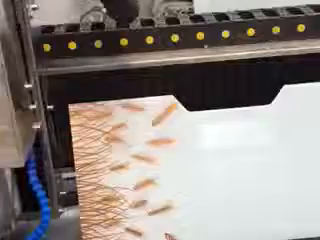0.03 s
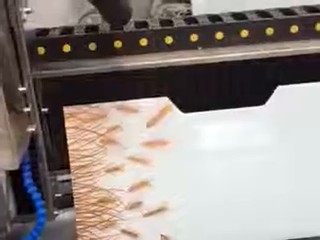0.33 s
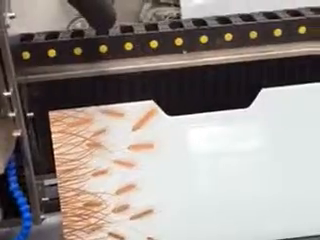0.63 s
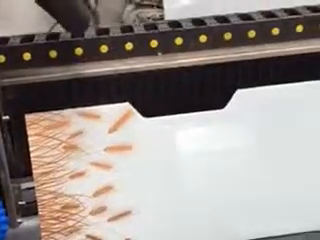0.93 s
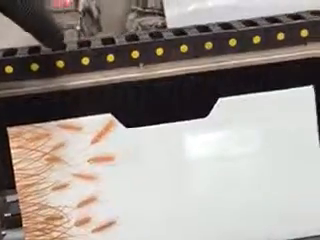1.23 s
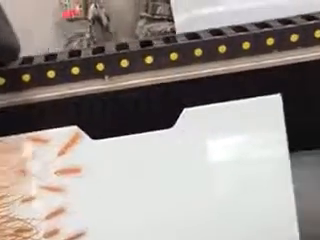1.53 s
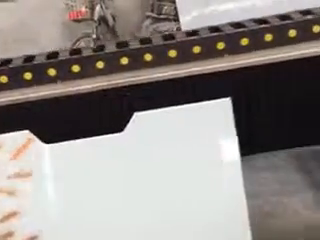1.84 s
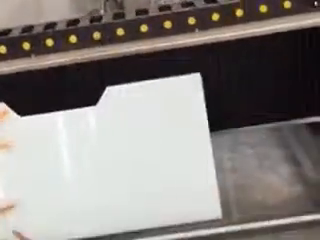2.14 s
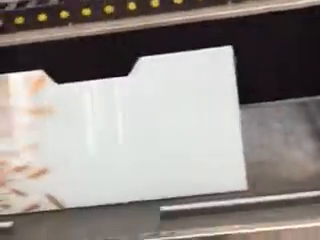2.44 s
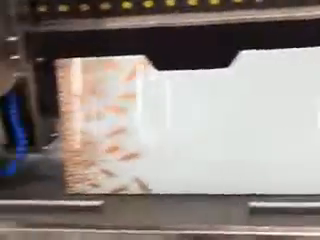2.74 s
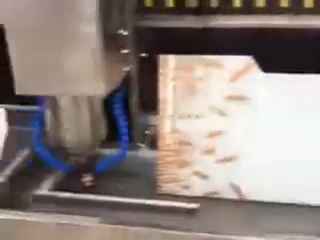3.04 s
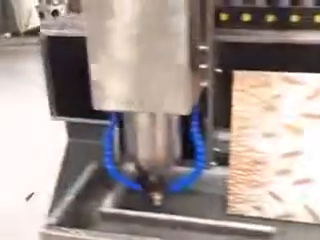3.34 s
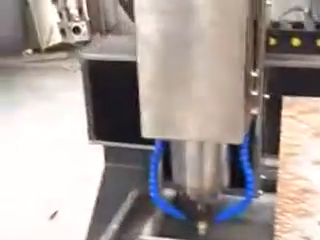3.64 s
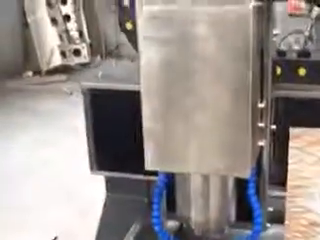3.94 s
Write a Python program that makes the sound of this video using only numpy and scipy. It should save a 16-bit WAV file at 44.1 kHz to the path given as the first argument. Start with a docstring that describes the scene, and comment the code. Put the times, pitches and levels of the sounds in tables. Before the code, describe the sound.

A glass processing machine hisses steadily with rushing coolant water over a motor rumble.

```python
"""Glass-working machine idling

Coolant rushes and patters over a motor rumble with a few wavering hums, and a jet of spray dies away.
A sharper, ringing hiss from the tool head fades in the first second and returns near the end.
The sound switches on just after the start, and a gain control gently turns down the loud moments."""
import sys
import numpy as np
from scipy import signal
from scipy.fft import rfft, irfft
from scipy.io import wavfile
from scipy.ndimage import uniform_filter1d

SR = 44100
rng = np.random.default_rng(int(sys.argv[2]) if len(sys.argv) > 2 else 0)


def wav_record(signal):
    """Record a signal, one row per channel, as 16-bit PCM in the file named by sys.argv[1]."""
    frames = np.transpose(np.atleast_2d(signal))
    bounded = np.clip(frames, -1, 1)
    # unit amplitude maps onto the largest positive 16-bit level
    quanta = np.round(bounded * 32767).astype(np.int16)
    wavfile.write(sys.argv[1], SR, quanta)


N = 176400  # 4 seconds
TIME = np.arange(N) / SR
FREQS = np.fft.rfftfreq(N, 1 / SR)


def amp(db):
    """Turn decibels into a number to multiply by."""
    return 10 ** (np.asarray(db) / 20)


def unit(x):
    """Scale a signal to an average strength (rms) of 1."""
    return x / np.sqrt(np.mean(x ** 2) + 1e-20)


def level(points):
    """Join (seconds, dB) points into a volume curve."""
    return amp(np.interp(TIME, *np.transpose(points)))


def colour(x, spectrum):
    """Shape a sound's lows and highs with (Hz, dB) points, then scale it to strength 1."""
    hz, db = np.transpose(spectrum)
    gain = amp(np.interp(np.log(FREQS + 1), np.log(hz), db))
    return unit(irfft(rfft(x) * gain, N))


def drift(rate_hz):
    """A smooth random wobble; a higher rate makes it quicker."""
    return unit(irfft(rfft(rng.standard_normal(N)) * np.exp(-(FREQS / rate_hz) ** 2), N))


def turbulence(spectrum, patchy_db, flicker_db):
    """Churning noise: small patches of it swell and dip, and the whole sound flickers."""
    _, _, grid = signal.stft(rng.standard_normal(N), SR, nperseg=512, noverlap=384)
    patches = uniform_filter1d(rng.standard_normal(grid.shape), size=9, axis=0)  # blur across pitch
    patches = unit(uniform_filter1d(patches, size=12, axis=1))  # blur across time
    noise = signal.istft(grid * amp(patchy_db * patches), SR, nperseg=512, noverlap=384)[1][:N]
    return colour(noise * amp(flicker_db * drift(rate_hz=45)), spectrum)


def resonances(modes):
    """Fuzzy whistles: noise ringing in narrow bands."""
    out = np.zeros(N)
    for hz, width, db in modes:
        band = rfft(rng.standard_normal(N)) / (1 + ((FREQS - hz) / width) ** 2)
        out += amp(db) * unit(irfft(band, N))
    return out


def tone(hz, wander_hz, shake_db, shake_hz):
    """A tone whose pitch and strength waver at random."""
    turns = np.cumsum(hz + wander_hz * drift(rate_hz=11.6)) / SR
    return unit(np.sin(2 * np.pi * turns) * amp(shake_db * drift(shake_hz)))


# The rumble's lows and highs. Each row: frequency in Hz, relative level in dB.
RUMBLE_SPECTRUM = [(25, -57.5), (42, -50.5), (64, -32), (80, -25.5), (100, -20.5), (135, -8), (168, 0),
                   (210, -0.5), (290, 0.5), (390, 1), (455, -3), (530, 0), (620, -9), (900, -25),
                   (2000, -70)]
# How loud the rumble and the main hum are. Each row: time in seconds, level in dB.
RUMBLE_LEVEL = [(0.1, -44), (0.6, -41.3), (1.1, -39.5), (1.6, -39.5), (2.1, -39.5), (2.8, -39), (3.4, -41),
                (3.95, -41)]
HUM_LEVEL = [(0.1, -66), (0.27, -42.5), (0.45, -61), (0.51, -39), (0.62, -37.5), (0.76, -45.5), (0.95, -47),
             (1.05, -59), (1.58, -52.5), (1.68, -41), (1.8, -47), (2.04, -57), (2.13, -40), (2.25, -55),
             (2.42, -40), (2.58, -49), (2.68, -42), (2.9, -44.5), (3.17, -40.5), (3.26, -49), (3.66, -53),
             (3.77, -43), (3.92, -46.5), (3.98, -65)]
# Tones of the drive. Each row: middle in seconds, half length in seconds, pitch in Hz, level in dB.
DRIVE_TONES = [(0.16, 0.24, 486, -45.5), (0.22, 0.3, 516.3, -47.5), (0.13, 0.12, 558, -44),
               (0.7, 0.35, 535, -48.5), (1.108, 0.091, 553, -43), (1.558, 0.22, 263.8, -43.5),
               (1.816, 0.17, 557.5, -47.5), (2.2, 4, 555.7, -53.5), (2.78, 0.31, 220.7, -45),
               (2.84, 0.12, 181, -46)]


def motors():
    """The motor and pump rumble, a hum throbs, and drive tones swell and fade."""
    out = level(RUMBLE_LEVEL) * turbulence(RUMBLE_SPECTRUM, patchy_db=1.0, flicker_db=1.24)
    out += level(HUM_LEVEL) * tone(hz=198.7, wander_hz=2.4, shake_db=3, shake_hz=32)
    for middle, half_length, hz, db in DRIVE_TONES:
        swell = amp(db) * np.exp(-((TIME - middle) / half_length) ** 2)
        out += swell * tone(hz, wander_hz=4, shake_db=2.5, shake_hz=27)
    return out


# The spray's lows and highs. Each row: frequency in Hz, relative level in dB.
JET_SPECTRUM = [(500, -52), (2400, -24.5), (2850, -2.5), (3450, 0), (3800, 2), (4150, -5), (4500, 0),
                (5000, -14.5), (7500, -37.5)]
# Where the jet rings. Each row: pitch in Hz, width in Hz, relative level in dB.
JET_RINGS = [(3020, 90, -11.5), (3335, 40, -6), (3506, 60, -4.5)]


def jet():
    """A bright, ringing jet of spray holds briefly, then fades evenly into the rush."""
    start_db, hold_s, fade_db_per_s = -30.5, 0.18, 17
    fade_db = fade_db_per_s * np.maximum(TIME - hold_s, 0)
    spray = turbulence(JET_SPECTRUM, patchy_db=0.6, flicker_db=0.3)
    return amp(start_db - fade_db) * (spray + resonances(JET_RINGS))


# The tool head's hiss. Each row: frequency in Hz, relative level in dB.
HISS_SPECTRUM = [(300, -46), (1800, -25.5), (2500, -6), (3200, 3), (4200, -11.5), (4800, -8.5),
                 (5600, -6.5), (6400, -6.5), (7200, -7.5), (7600, -22.5)]
# Where the head rings. Each row: pitch in Hz, width in Hz, relative level in dB.
HEAD_RINGS = [(2174, 25, -12.5), (2898, 55, 0.5), (3350, 140, -8), (3530, 70, -8), (4530, 95, -2.5),
              (5930, 170, -10), (7070, 100, -6.5)]
# How the hiss and ringing fade and return. Each row: time in seconds, relative level in dB.
HEAD_LEVEL = [(0.12, -4.5), (0.3, -11.5), (0.55, -13.5), (0.85, -28), (2.2, -21.5), (3.69, -14.5),
              (3.73, -4), (3.8, -1.5), (3.88, -0.8), (4.0, 1)]
# How loud the shrill whistle is. Each row: time in seconds, level in dB.
WHISTLE_LEVEL = [(0.12, -39), (0.3, -46.5), (0.55, -50), (0.85, -61), (3.69, -57), (3.75, -37),
                 (3.82, -35.5), (3.87, -38), (3.905, -30), (3.94, -40), (4.0, -37)]


def tool_head():
    """The tool head hisses and rings, with a shrill whistle that flares and eases."""
    hiss = amp(-31) * turbulence(HISS_SPECTRUM, patchy_db=0.7, flicker_db=0.3)
    ring = amp(-32) * unit(resonances(HEAD_RINGS))
    core = tone(hz=5370, wander_hz=38.1, shake_db=4, shake_hz=110)
    fuzz = resonances([(5430, 97, 2)])  # pitch in Hz, width in Hz, dB above the core
    whistle = level(WHISTLE_LEVEL) * unit(core + fuzz)
    return level(HEAD_LEVEL) * (ring + hiss) + whistle


# The rush of coolant and machine air. Each row: frequency in Hz, relative level in dB.
RUSH_SPECTRUM = [(350, -42.5), (600, -6.5), (700, -4.5), (930, -7.5), (1220, -4.5), (1450, -6.5),
                 (1950, -3.5), (2400, -6), (3080, -2.5), (3600, -1.5), (3950, 1.2), (4500, -1.5),
                 (4830, -11.5), (5200, -12), (6100, -10), (6800, -16), (7300, -23.5), (7600, -22)]
# Thin whistles in the rush. Each row: pitch in Hz, width in Hz, level in dB at full flow.
RUSH_WHISTLES = [(6160, 30, -55), (6710, 23, -56)]
# How the rush swells and eases. Each row: time in seconds, level in dB compared with full flow.
RUSH_LEVEL = [(0.1, -3.5), (0.5, -1.5), (0.9, 0), (1.8, -0.37), (2.6, -0.1), (3.5, 0), (3.95, -1.5)]


def coolant():
    """Churning coolant rushes, with the patter of many tiny drops and faint whistles."""
    drops_per_s, drop_spread_db, drop_share, low_cut_hz = 3500, 2, 0.12, 628
    hits = (rng.random(N) < drops_per_s / SR) * rng.choice([-1., 1.], N)
    sizes = amp(drop_spread_db * np.minimum(rng.exponential(1, N), 4))
    drops = colour(hits * sizes, RUSH_SPECTRUM)
    flow = turbulence(RUSH_SPECTRUM, patchy_db=0.47, flicker_db=0.5)
    rush = np.sqrt(1 - drop_share) * flow + np.sqrt(drop_share) * drops
    rush = signal.sosfilt(signal.butter(4, low_cut_hz, "high", fs=SR, output="sos"), rush)
    return level(RUSH_LEVEL) * (amp(-30) * unit(rush) + resonances(RUSH_WHISTLES))


def scene():
    """Add up all the sources, the same on the left and right."""
    mono = coolant() + motors() + tool_head() + jet()
    return np.array([mono, mono])


def record(dry):
    """Turn down the loud moments, switch the sound on in two steps, and cut the highest treble."""
    threshold_db, cut_per_db, top_hz = -27.5, 0.22, 7440
    power = uniform_filter1d((dry ** 2).mean(0), size=4000)
    excess_db = np.maximum(10 * np.log10(abs(power) + 1e-12) - threshold_db, 0)
    evened = dry * amp(-cut_per_db * excess_db)
    opening = np.interp(TIME, [0.073, 0.077, 0.085, 0.089], [0, amp(-8), amp(-8), 1])
    treble_cut = signal.firwin(601, top_hz, window=("kaiser", 9), fs=SR)
    return signal.oaconvolve(evened * opening, treble_cut[None], "same")


dry = scene()
out = record(dry)
wav_record(out)
```